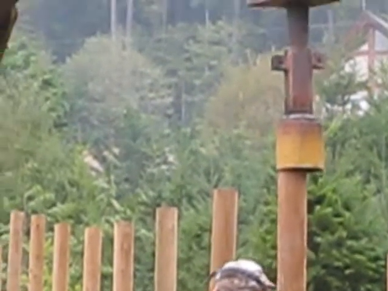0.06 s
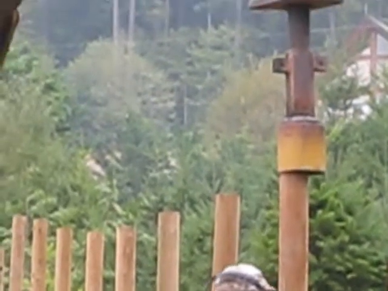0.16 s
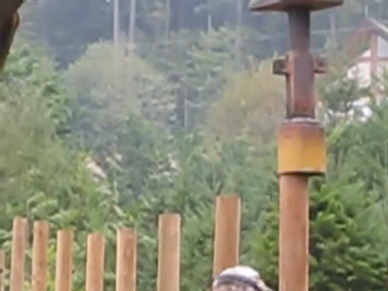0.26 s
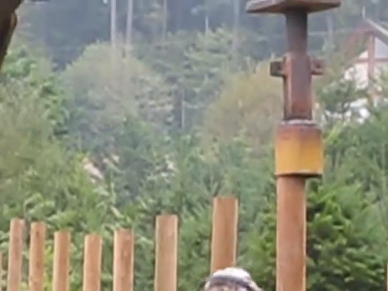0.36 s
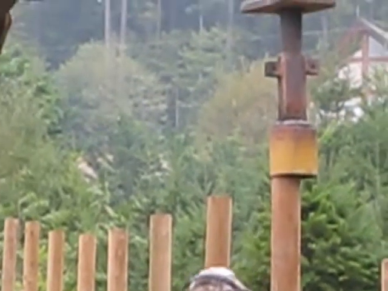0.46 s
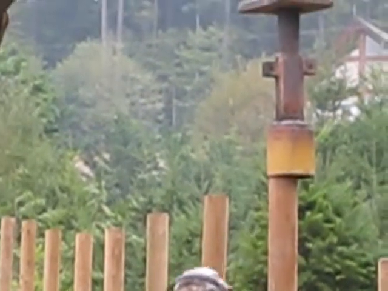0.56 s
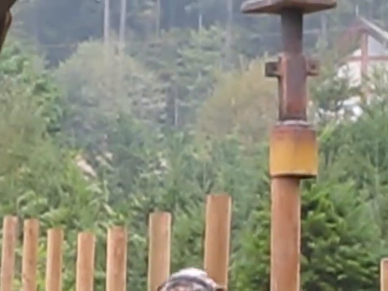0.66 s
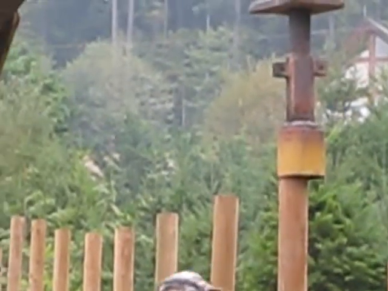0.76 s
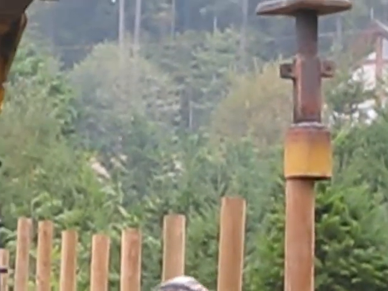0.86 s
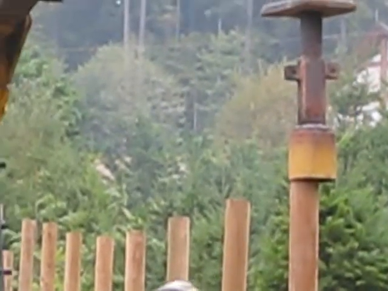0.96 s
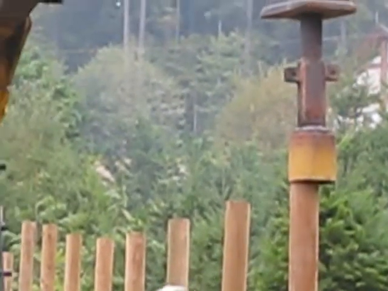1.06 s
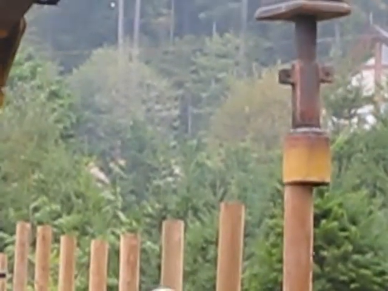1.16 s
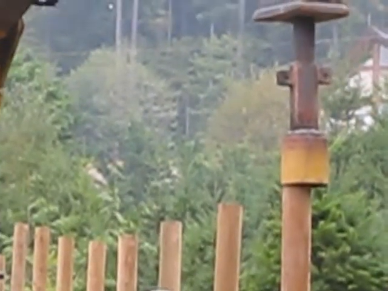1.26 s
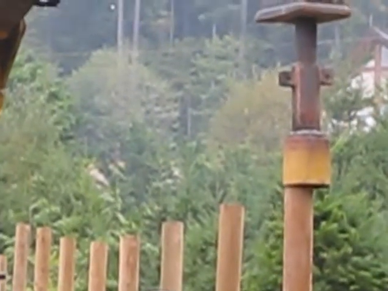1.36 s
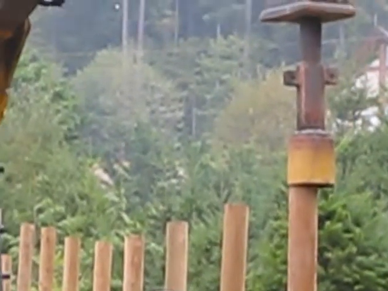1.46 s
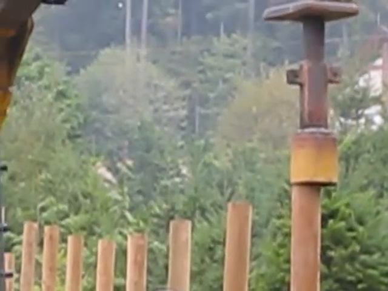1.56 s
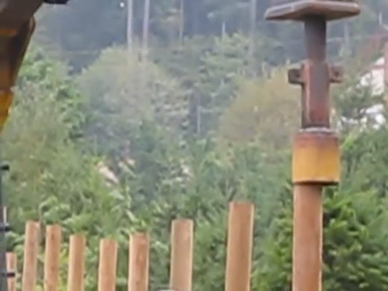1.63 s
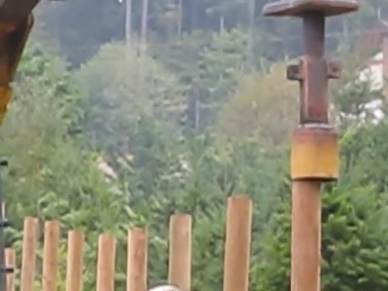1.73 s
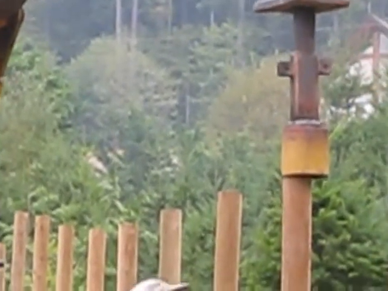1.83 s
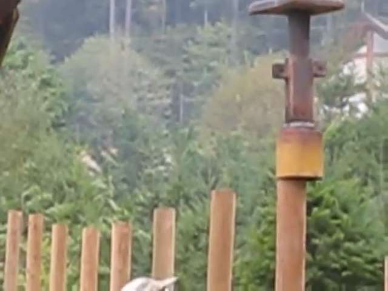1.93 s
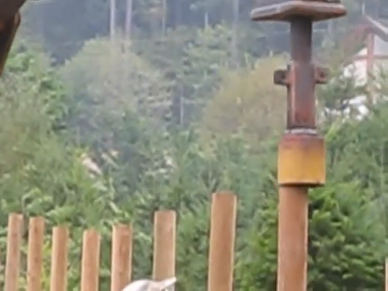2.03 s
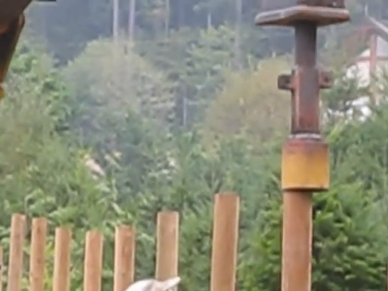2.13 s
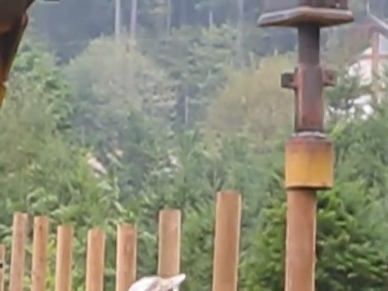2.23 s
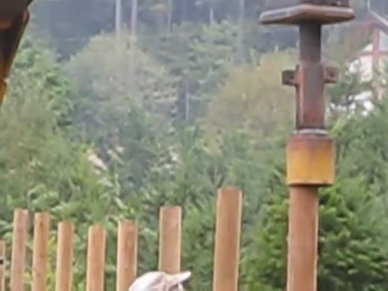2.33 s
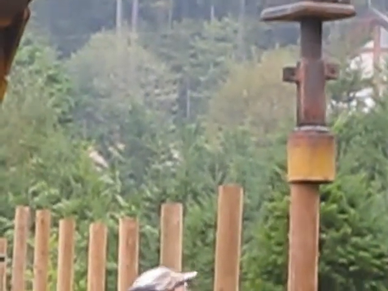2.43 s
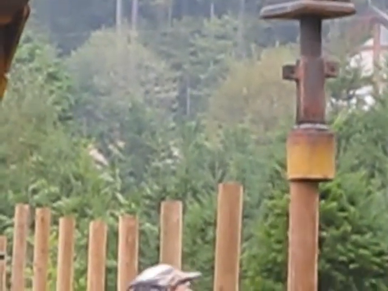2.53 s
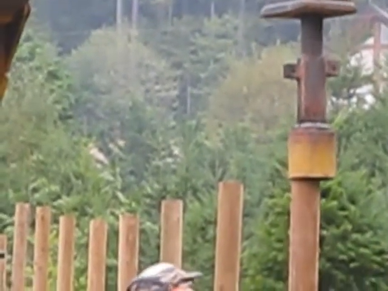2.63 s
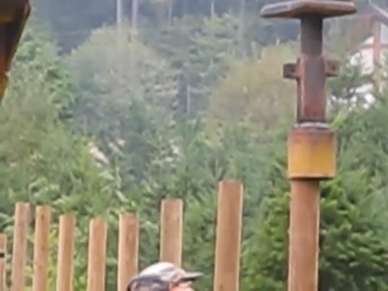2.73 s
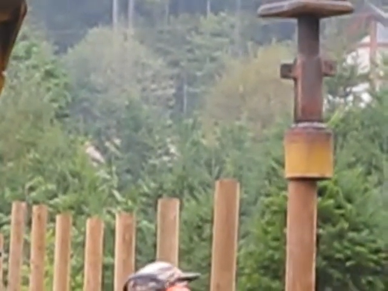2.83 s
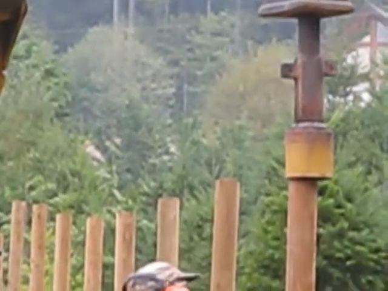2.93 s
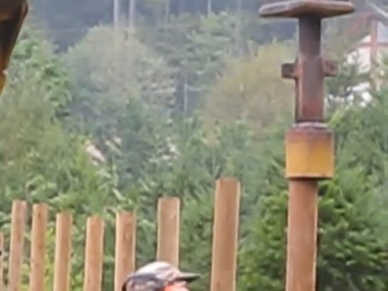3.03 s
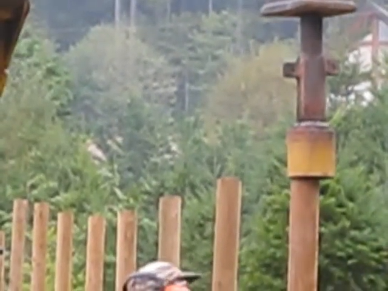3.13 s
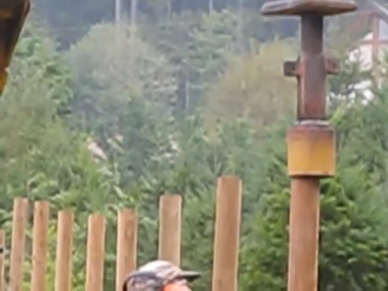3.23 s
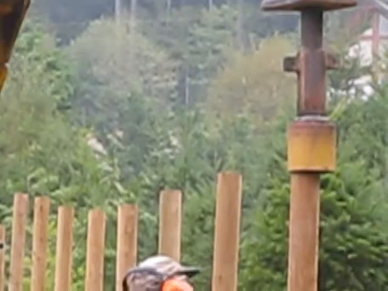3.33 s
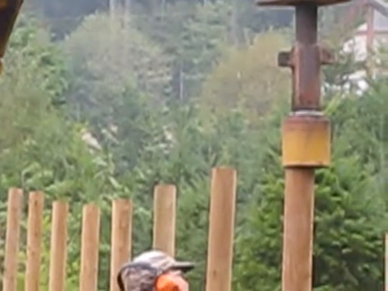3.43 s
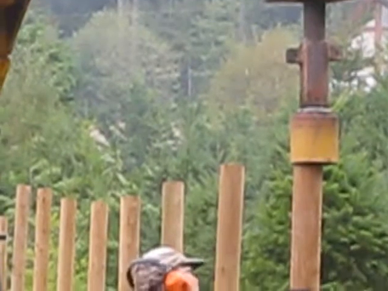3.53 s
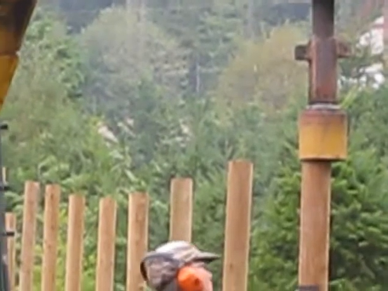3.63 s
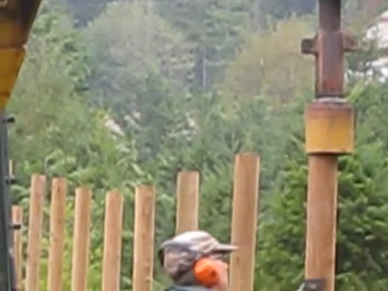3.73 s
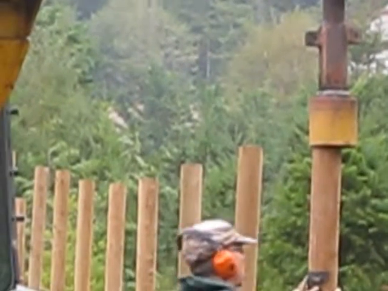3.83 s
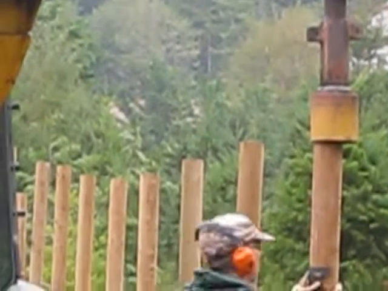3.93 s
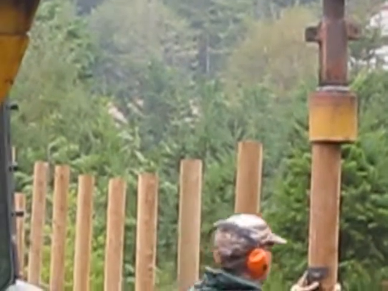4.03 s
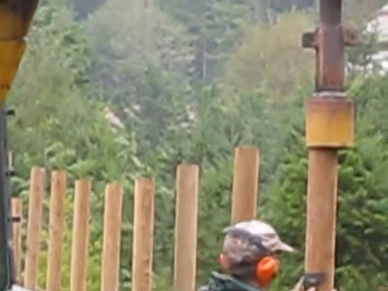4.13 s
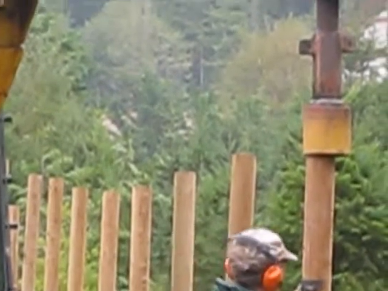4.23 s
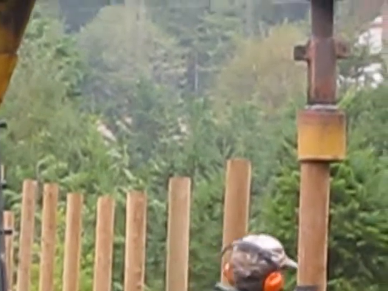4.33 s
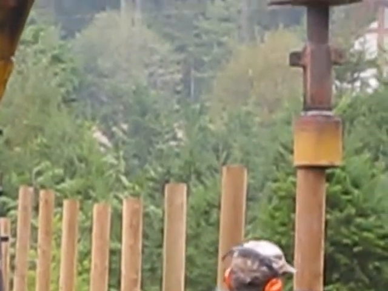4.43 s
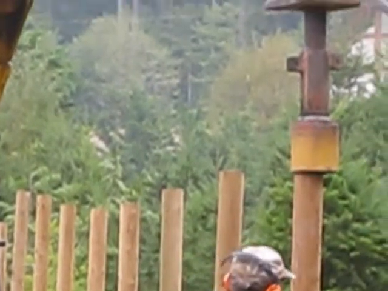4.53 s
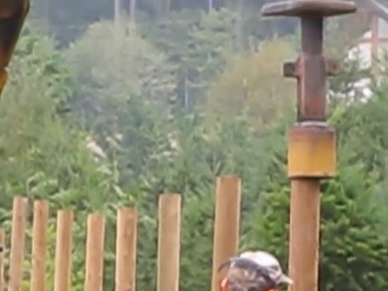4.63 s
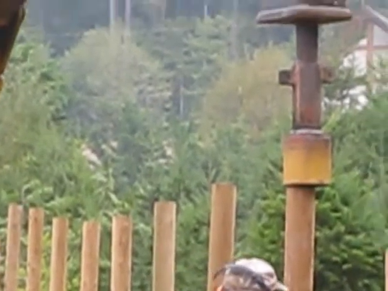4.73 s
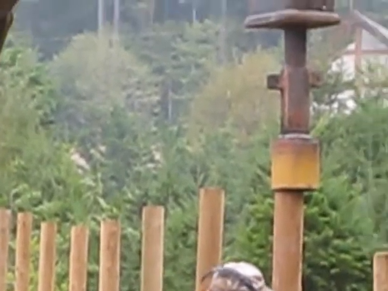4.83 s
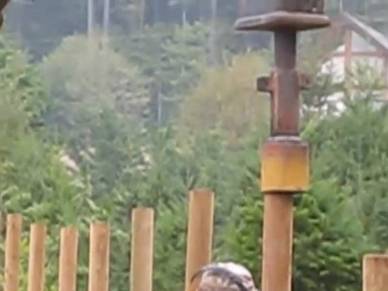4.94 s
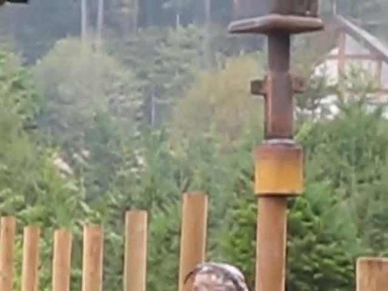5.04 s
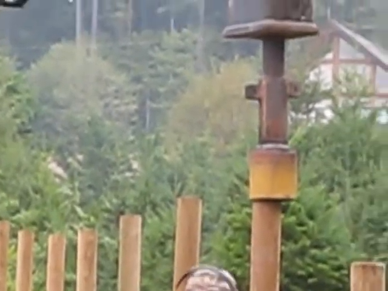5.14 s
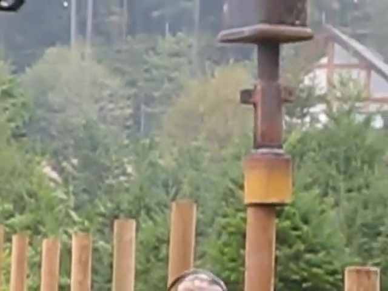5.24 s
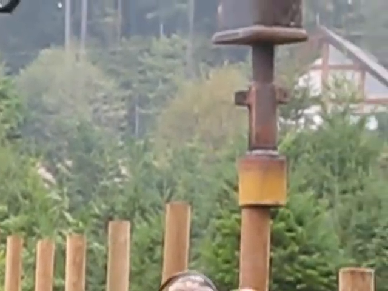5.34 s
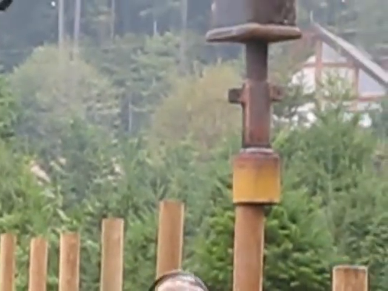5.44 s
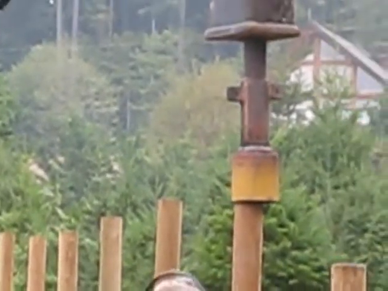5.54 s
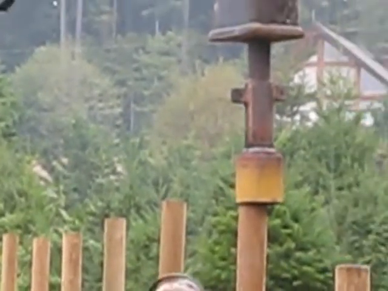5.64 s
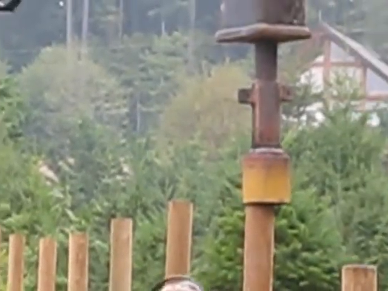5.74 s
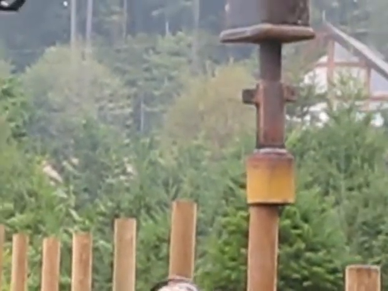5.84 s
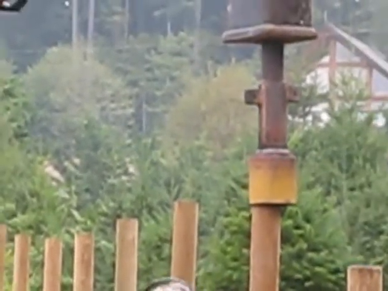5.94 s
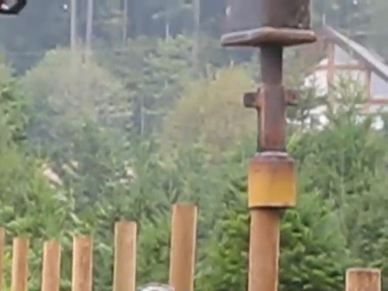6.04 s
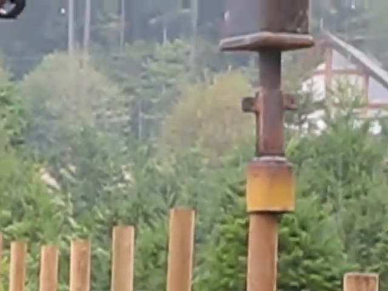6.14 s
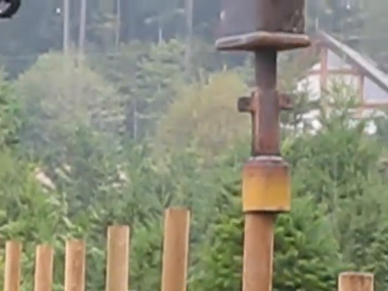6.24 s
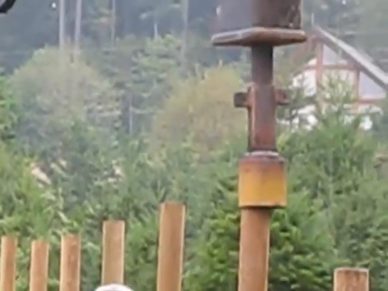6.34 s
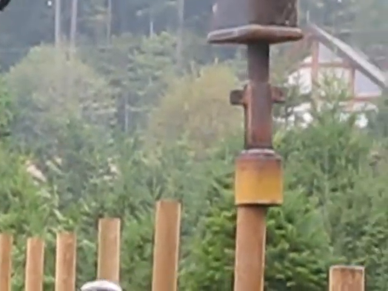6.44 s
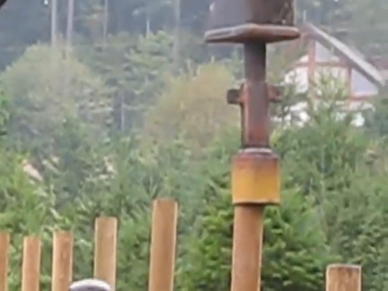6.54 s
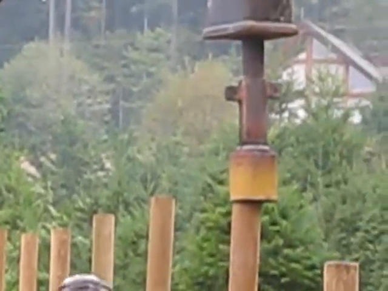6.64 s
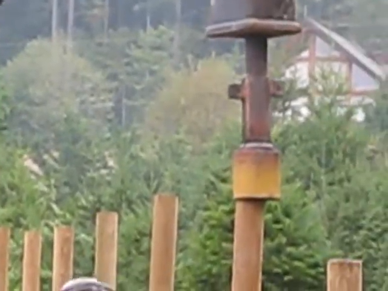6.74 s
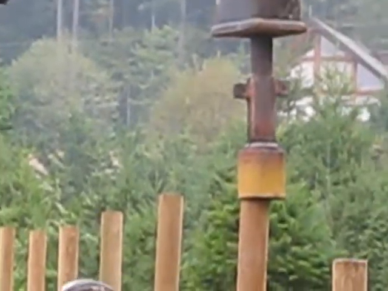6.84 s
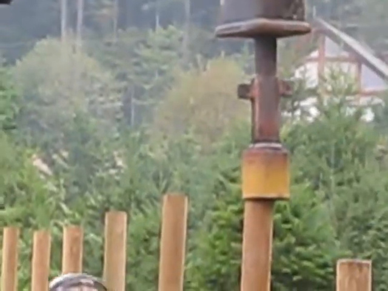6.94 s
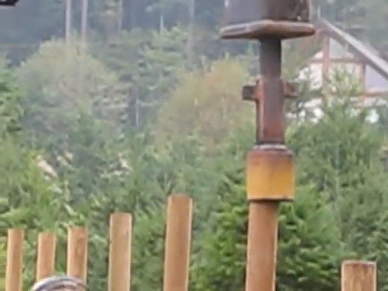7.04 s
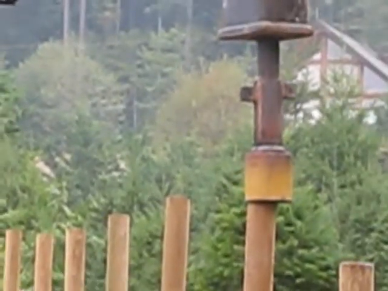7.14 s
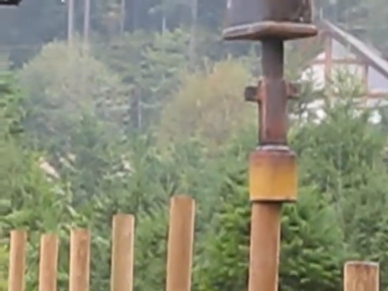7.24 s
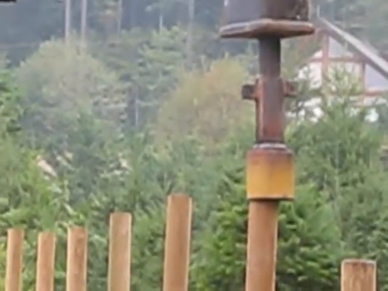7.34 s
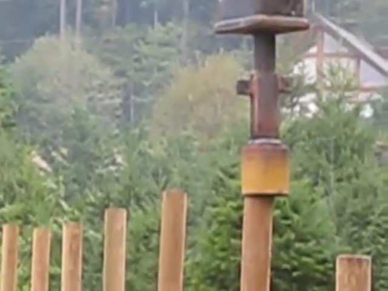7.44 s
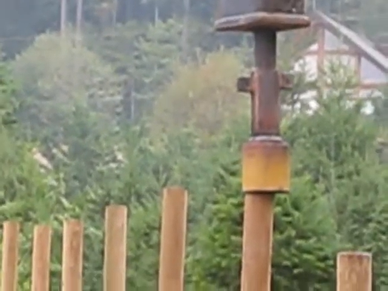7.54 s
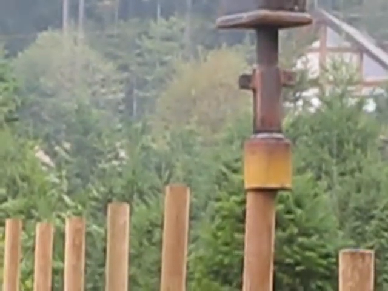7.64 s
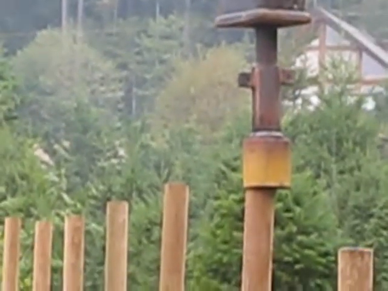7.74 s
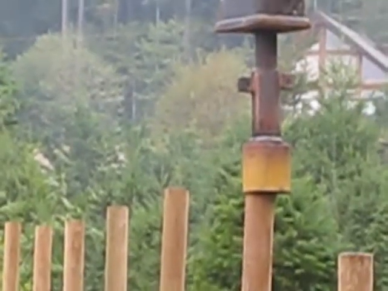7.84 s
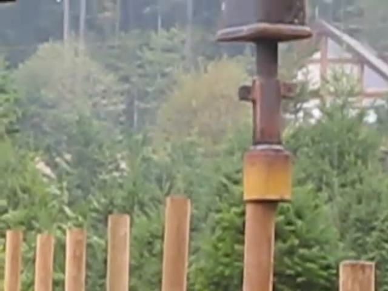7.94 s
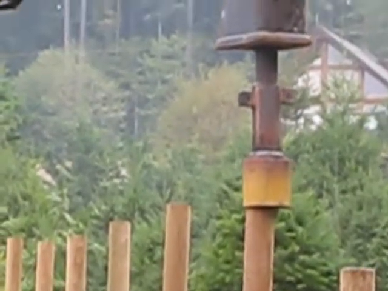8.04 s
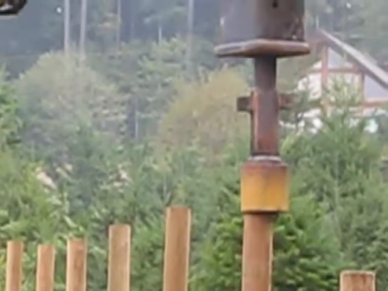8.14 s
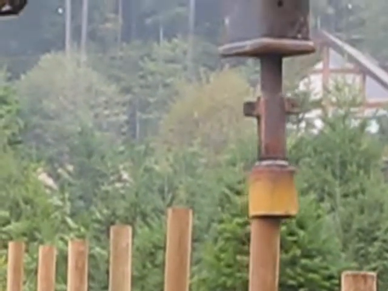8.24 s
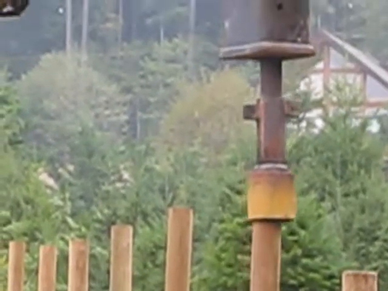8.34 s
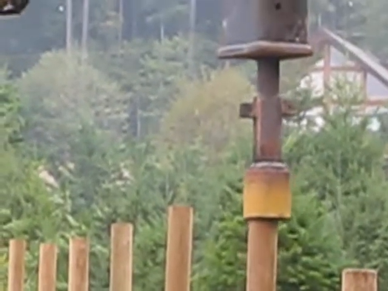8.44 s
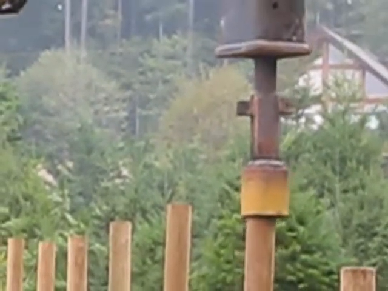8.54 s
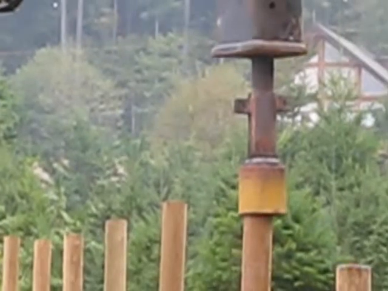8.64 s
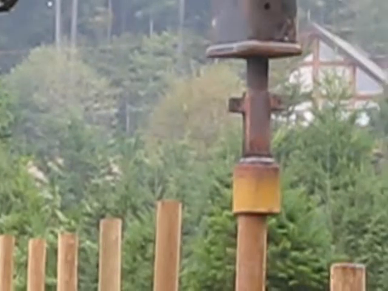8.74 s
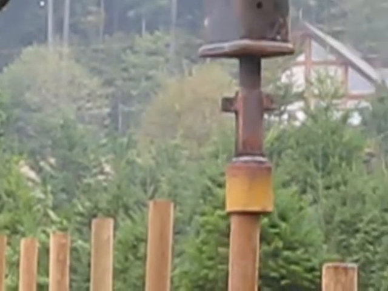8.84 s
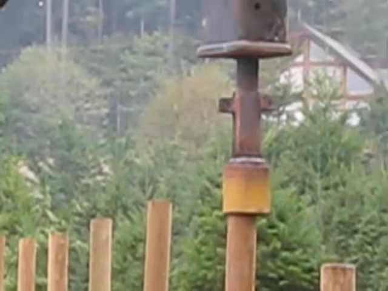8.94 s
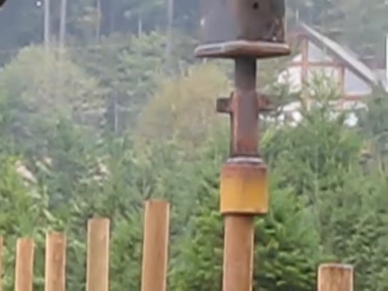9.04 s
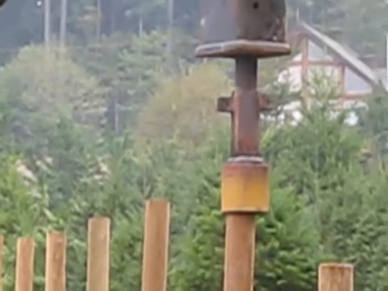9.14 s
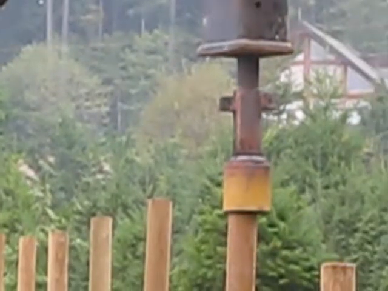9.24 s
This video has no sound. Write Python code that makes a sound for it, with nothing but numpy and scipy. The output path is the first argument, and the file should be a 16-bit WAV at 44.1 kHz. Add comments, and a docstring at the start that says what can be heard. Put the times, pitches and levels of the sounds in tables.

```python
"""A backhoe's four-cylinder diesel idles outdoors: a low hum, a repeating clatter and ringing parts.
Its hydraulic hammer rests on a wooden post. The loose cap clunks, and oil hisses, whistles and groans
as the pump takes load. The hammer fires one hard blow: a noise crack, decaying steel modes and a shimmer
of many weak tones, then the wooded slope answers with slow noise. A gain control ducks and recovers."""
import sys
import numpy as np
from scipy import signal
from scipy.fft import rfft, irfft, next_fast_len
from scipy.io import wavfile
from scipy.ndimage import uniform_filter1d, map_coordinates

SR = 44100
rng = np.random.default_rng(int(sys.argv[2]) if len(sys.argv) > 2 else 0)


def pcm_store(signal):
    """Save signal as 16-bit PCM."""
    levels = np.round(np.clip(np.atleast_2d(signal), -1, 1) * 32767)
    wavfile.write(sys.argv[1], SR, levels.astype(np.int16).T)


N = 409688

# Noise spectra give relative level per hertz; each sound is scaled to rms 1 before its own level.
# Outdoor air: freq_hz, level_db
AIR_SPECTRUM = [(20, -2), (45, 2), (200, 6.5), (1000, 12), (4000, 0.5), (6500, -10.5), (8500, -38.5),
                (12000, -2.5), (14000, -68)]
# Oil valve openings: opens_s, closes_s, pump_load (0-1)
VALVE_OPENINGS = [(1.301, 2.503, .22), (7.05, 8.499, 0.98), (9.002, 9.29, 1)]
# Exhaust hum partials: firing_rate_multiple, unloaded_level_db (rms)
EXHAUST_PARTIALS = [(1, -63), (2, -50), (3.5, -53.5), (4, -51), (6.5, -66.5), (13, -60)]
# Engine clatter: freq_hz, level_db
BLOCK_SPECTRUM = [(40, -22), (85, -16), (140, -2), (195, -3.5), (235, -8), (330, -4), (500, -6), (690, -9),
                  (1000, -1.5), (1300, -4), (1700, -6), (2600, -9), (3500, -14.5), (4400, -20), (6700, -24),
                  (8500, -100)]
# Engine parts knocked once a firing: pitch_hz, half_width_hz, lag_firings, decay_firings,
# tap_to_buzz_ratio, level_db, then cylinder_db for each of the four cylinders
ENGINE_PARTS = [(599.5, 38, .42, 0.35, 0.96, -49, 0.5, -10, -2.7, 7.5),
                (845, 66, .5, 0.47, 1.44, -45, -9, -10.5, 0, -13),
                (1046, 38, .76, 0.9, 1.5, -46.5, -4, -15, 3, 1),
                (1146, 52, .53, 0.52, 1.46, -48.5, -3, 0.5, -7.5, 0),
                (1404.4, 20.7, .68, 0.59, 2, -41.5, -7, -6, -1.5, 0),
                (2526, 150, .5, 0.45, .1, -48.5, 0, 3.5, 1.5, 3.5),
                (3866, 56, 0.58, 1, 0.53, -50, -5.5, -7.5, -7, -7.5)]
# Oil hiss: freq_hz, level_db
HISS_SPECTRUM = [(300, -33), (1500, -2), (2700, 8), (4500, 0.5), (5600, 0.5), (7000, -2), (8300, -30.5),
                 (10000, 0.5), (12000, -7.5), (14000, -6), (16000, -55)]
# Cap on its post: pitch_hz, t60_s with the cap seated
CAP_MODES = [(515, .09), (1195, .11), (1563, .3), (2215, .1), (2590, .12), (3575, .14), (4945, .13),
             (5510, .13), (6300, .12)]
# Loose contacts: start_s, rattle_db, post_thud_db, cap_clank_db, high_ring_db, ring_length (1 = cap seated)
CAP_CLUNKS = [(2.3282, -19.5, -18.5, -25, -31.5, 1), (8.163, -14, -28, -8, -17.5, 0.97),
              (8.222, -37, -50, -47, -14.5, 0.41), (8.237, -27, -7, -10, -14, 0.43),
              (8.381, -4.5, -26, -3, -21, .4), (8.392, -4, -22.5, -22, -12.5, 3.1),
              (8.761, -16.5, -19.5, -25, -12.5, 1), (8.787, -32, -32, -27, -18, 1.25)]
# Chatter of the loose cap: freq_hz, level_db
RATTLE_SPECTRUM = [(150, -13), (450, -0.5), (1200, 5.5), (2600, 7), (4200, -12.5), (6200, -3), (7500, -23),
                   (15000, -37)]
# Crack of the blow: freq_hz, level_db
CRACK_SPECTRUM = [(40, -19), (200, -22), (500, 4), (900, -3), (2400, 4), (4300, -4), (6000, 0.5),
                  (8000, -11.5), (11000, -2), (15500, -9)]
# Many weak steel modes: freq_hz, level_db
SHIMMER_SPECTRUM = [(300, -40), (1200, -4), (2600, 4), (4200, -4), (6000, 2.5), (8000, -22), (10000, -2),
                    (13000, -14), (15500, -10)]
# The hammer's free steel: pitch_hz, relative level_db, t60_s
STEEL_MODES = [(1566, -15, 1.8), (2149, -15.5, 2.4), (2207, -24, 1), (2579, -26, 1.3), (2648, -22, 1.3),
               (2796, -17, 1.7), (3475, -23, 1), (3527, -25, 1), (3570, -15, .8), (4275, -25, 1),
               (4780, -28, 1.5), (4915, -25, 1.2), (5436, -24, 1.1), (5491, -15, 1.1), (5698, -21, 1.4),
               (5747, -23, 1), (6025, -22, 1.3), (6093, -23, .85), (6318, -17, 1), (7644, -30, .9),
               (8624, -28, .6), (9125, -27, .7), (9947, -13, .8), (10168, -13, .82), (11020, -22, .8),
               (11553, -23, 1), (11816, -22, .55), (12080, -27, .7), (12950, -24, .6), (15194, -23, .75)]
# Echo from the slope: freq_hz, level_db
SLOPE_SPECTRUM = [(30, -3), (70, 3), (200, -12), (500, 4), (1300, 3.5), (2600, 4), (4500, 1), (7000, -10),
                  (15000, -52)]

OPEN_S, CLOSE_S = 0.62, 0.58  # the load builds and falls away over these times
IDLE_HZ = 30.004  # firings per second without load
DROOP_HZ, SAG_HZ = 0.24, 0.7  # firing rate lost under steady full load, and briefly on taking it up
GOVERNOR_S = 0.2  # time constant of the governor's answer
HISS_DB, WHISTLE_DB, GROAN_DB = -37, -49, -44.5  # centre levels at full load, groan before its swell
HISS_GROWS = 1.25  # the hiss rises as this power of the load
CHARGE_S, CHARGE_WIDTH_S, CHARGE_DB = 7.88, 0.27, 12  # groan swell: peak time, spread, added level
BLOW_S = 8.237


def amp(db):
    """Decibels to gain."""
    return 10 ** (np.asarray(db) / 20)


def unit(x):
    """Scale to rms 1."""
    return x / np.sqrt(np.mean(x ** 2) + 1e-20)


def clock():
    """The time of every sample in seconds."""
    return np.arange(N) / SR


def wobble(rate):
    """A smooth random curve through rate knots a second."""
    knots = rng.standard_normal(int(N * rate / SR) + 4)
    return map_coordinates(knots, [clock() * rate])


def filtered(x, response):
    """Shape x by a gain that depends on frequency."""
    size = next_fast_len(N + SR // 2)
    spectrum = rfft(x, size) * response(np.fft.rfftfreq(size, 1 / SR))
    return irfft(spectrum, size)[..., :N]


def coloured(x, points):
    """Shape x by a spectrum drawn over log frequency, at rms 1."""
    freq_hz, level_db = np.transpose(points)
    return unit(filtered(x, lambda f: amp(np.interp(np.log(f + 1), np.log(freq_hz), level_db))))


def noise(points):
    """Fresh noise of a given spectrum, at rms 1."""
    return coloured(rng.standard_normal(N), points)


def partials(points, count):
    """A cloud of steady tones at random pitches, shaped by a spectrum, at rms 1."""
    lines = np.zeros(N // 2 + 1, complex)
    places = rng.integers(len(lines), size=count)
    lines[places] = np.exp(2j * np.pi * rng.random(count))
    return coloured(irfft(lines, N), points)


def resonate(x, centre_hz, half_width_hz):
    """Two equal resonances in series give steep skirts; the result has rms 1."""
    def response(f):
        damping = 2j * f * half_width_hz
        return (damping / (centre_hz ** 2 - f * f + damping)) ** 2
    return unit(filtered(x, response))


def fade(start, t60, attack):
    """Envelope of something struck at start: a quick rise over an exponential decay."""
    age = np.maximum(clock() - start, 0)
    return (1 - np.exp(-age / attack)) * np.exp(-np.log(1000) * age / t60)


def outdoor_air():
    """Steady coloured noise fills the open air."""
    return amp(-44.0) * noise(AIR_SPECTRUM)


def pump_load():
    """Each valve opening loads the pump smoothly and lets go; a short one never reaches its full load."""
    t = clock()
    load = np.zeros(N)

    def ramp(u):
        return np.sin(np.pi / 2 * np.clip(u, 0, 1)) ** 2

    for opens, closes, full in VALVE_OPENINGS:
        load += full * ramp((t - opens) / OPEN_S) * (1 - ramp((t - closes) / CLOSE_S))
    return load


def crank(load):
    """Firings counted so far: mainly heavy load slows the engine, and the governor answers late."""
    strain = load ** 2
    keep = np.exp(-1 / (GOVERNOR_S * SR))
    answered = signal.lfilter([1 - keep], [1, -keep], strain)
    firing_hz = IDLE_HZ - DROOP_HZ * strain - SAG_HZ * (strain - answered)
    return np.cumsum(firing_hz) / SR


def cyclic_noise(firings, repeat):
    """White noise of which a share of the power comes back with every four firings."""
    size = SR // 7
    place = (firings / 4 % 1 * size).astype(int)
    pattern = rng.standard_normal(size)[place]
    return np.sqrt(repeat) * pattern + np.sqrt(1 - repeat) * rng.standard_normal(N)


def jolts(firings, lag, decay, cylinder_db, scatter_db):
    """Each firing gives a jolt sized by its cylinder, decaying until the next one takes over."""
    index = np.floor(firings - lag).astype(int)
    scatter = scatter_db * rng.standard_normal(index.max() + 2)[index]
    size_db = np.take(cylinder_db, index, mode="wrap") + scatter
    return amp(size_db) * np.exp(-((firings - lag) % 1) / decay)


def exhaust(load, firings):
    """Exhaust pulses hum at multiples of the firing rate; load lifts the lowest ones most."""
    hum = np.zeros(N)
    for multiple, level_db in EXHAUST_PARTIALS:
        gain = amp(level_db + 9 * load / multiple + 0.41 * wobble(13))
        hum += gain * np.sqrt(2) * np.sin(2 * np.pi * (multiple * firings + rng.random()))
    return hum


def block(load, firings):
    """Firing jolts shake the block into cyclic clatter, and under load into a low boom."""
    shake = 1.1 + jolts(firings, lag=0.5, decay=0.61, cylinder_db=[-1.7, 0.17, -0.98, -1.6], scatter_db=0.9)
    clatter = coloured(shake * cyclic_noise(firings, repeat=0.72), BLOCK_SPECTRUM)
    boom = resonate(shake * cyclic_noise(firings, repeat=0.62), centre_hz=171, half_width_hz=24)
    return amp(-36.5 - 0.6 * load) * clatter + amp(-44.5) * load * boom


def knocks(firings):
    """Each part rings from a sharp tap, then buzzes on under the dying jolt."""
    # the crank speeds up and slows within each four-firing cycle
    uneven = firings + 0.017 * np.sin(np.pi / 2 * firings) + 0.002 * wobble(20)
    out = np.zeros(N)
    for pitch_hz, half_width_hz, lag, decay, tap_ratio, level_db, *cylinder_db in ENGINE_PARTS:
        push = jolts(uneven, lag, decay, cylinder_db, scatter_db=0.5)
        taps = np.maximum(np.diff(push, prepend=push[0]), 0)  # only the sudden rises
        buzz = push * cyclic_noise(firings, repeat=0.75)
        drive = tap_ratio * unit(taps) + unit(buzz)
        out += amp(level_db) * resonate(drive, pitch_hz, half_width_hz)
    return out


def engine(load, firings):
    """Exhaust, block and ringing parts together; load deepens the hum and quiets the knocking."""
    return exhaust(load, firings) + block(load, firings) + amp(-5 * load ** 2) * knocks(firings)


def hydraulics(load, firings):
    """Oil whistles at the valve's edge, hisses in pump strokes as the flow grows, and groans in the hose."""
    strokes_db = 2.6 * np.sin(2 * np.pi * firings)
    hiss = amp(HISS_DB + strokes_db) * noise(HISS_SPECTRUM)
    whistle = amp(WHISTLE_DB) * resonate(rng.standard_normal(N), centre_hz=5530, half_width_hz=110)
    # the groan swells as pressure builds before the blow
    charge = np.exp(-((clock() - CHARGE_S) / CHARGE_WIDTH_S) ** 2)
    groan_tone = resonate(rng.standard_normal(N), centre_hz=372, half_width_hz=133)
    groan = amp(GROAN_DB + CHARGE_DB * charge) * groan_tone
    return load ** HISS_GROWS * hiss + load * (whistle + groan)


def clunks():
    """The loose cap chatters against tool and post; its modes ring longer when it is lifted clear."""
    out, t = np.zeros(N), clock()
    chatter, drift = noise(RATTLE_SPECTRUM), wobble(90)
    high_offsets_db = np.array([-11.5, -4.5, -2, 2.5, -10, -6.5, -11.5])  # cap modes above thud and clank
    for start, rattle_db, thud_db, clank_db, ring_db, length in CAP_CLUNKS:
        out += amp(rattle_db + 4) * fade(start, t60=0.062, attack=0.0065) * chatter
        levels_db = [thud_db, clank_db, *(ring_db + high_offsets_db)]
        for (pitch_hz, t60), level_db in zip(CAP_MODES, levels_db):
            blur = 0.15 * np.roll(drift, rng.integers(N))  # the grinding contact blurs each mode
            tone = np.sin(2 * np.pi * (pitch_hz * t + rng.random() + blur))
            out += amp(level_db) * fade(start, t60 * length, attack=0.0032) * tone
    return out


def steel_ring():
    """Free steel rings in long modes; much of the low ones arrives late by way of the slope."""
    out, t, flutter = np.zeros(N), clock(), wobble(22)
    for pitch_hz, level_db, t60 in STEEL_MODES:
        paths = 1 + 0.2 * np.roll(flutter, rng.integers(N))  # reflections add and cancel
        low = 1 / (1 + (pitch_hz / 2800) ** 4)  # near 1 for low modes, near 0 for high
        direct = amp(-9 * low) * fade(BLOW_S, t60, attack=0.001)
        returned = 0.56 * low * fade(BLOW_S + 0.19, t60=1.65, attack=0.11)
        tone = np.sin(2 * np.pi * (pitch_hz * t + rng.random()))
        out += amp(level_db) * paths * (direct + returned) * tone
    return amp(1.7) * out


def slope_echo():
    """The wooded slope scatters the blow into a late, wavering wash of noise."""
    level = amp(-23.5 + 2.4 * wobble(25))
    return level * fade(BLOW_S + 0.15, t60=2.18, attack=0.033) * noise(SLOPE_SPECTRUM)


def blow():
    """The piston strikes: a crack, long steel modes over many weak ones, then the slope's echo."""
    crack = amp(10.5) * fade(BLOW_S, t60=0.077, attack=0.00088) * noise(CRACK_SPECTRUM)
    cloud = partials(SHIMMER_SPECTRUM, count=260) + 0.25 * noise(SHIMMER_SPECTRUM)
    shimmer = amp(-4.5) * fade(BLOW_S, t60=0.7, attack=0.002) * cloud
    return crack + shimmer + steel_ring() + slope_echo()


def scene():
    """The pump's load drives engine and oil; everything reaches both channels alike."""
    load = pump_load()
    firings = crank(load)
    mono = outdoor_air() + engine(load, firings) + hydraulics(load, firings) + clunks() + blow()
    return np.array([mono, mono])


def gain_control(x, limit_db, release_db, attack):
    """The gain drops quickly on a loud sound and climbs back by release_db a second."""
    power = np.abs(uniform_filter1d(x[0] ** 2, size=128))
    over_db = np.maximum(10 * np.log10(power + 1e-12) - limit_db, 0)
    climb = release_db * clock()
    cut_db = np.maximum.accumulate(over_db + climb) - climb  # hold each peak, less the climb since
    keep = np.exp(-1 / (attack * SR))
    return x * amp(-signal.lfilter([1 - keep], [1, -keep], cut_db))


def record(dry):
    """Gain control, soft overload, then a steep cut of the extreme treble."""
    held = gain_control(dry, limit_db=-11, release_db=71.0, attack=0.0023)
    clipped = held / (1 + held ** 4) ** 0.25
    # the cut falls from full to nothing over the last 100 Hz below 15900 Hz
    return filtered(clipped, lambda f: np.clip((15900 - f) / 100, 0, 1))


dry = scene()
out = record(dry)
pcm_store(out)
```